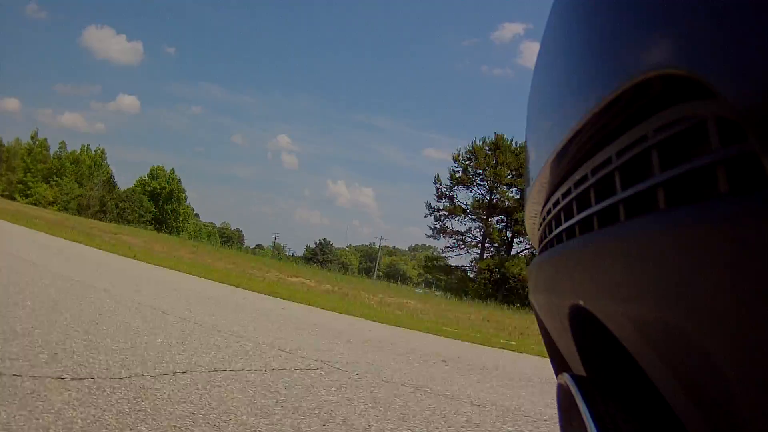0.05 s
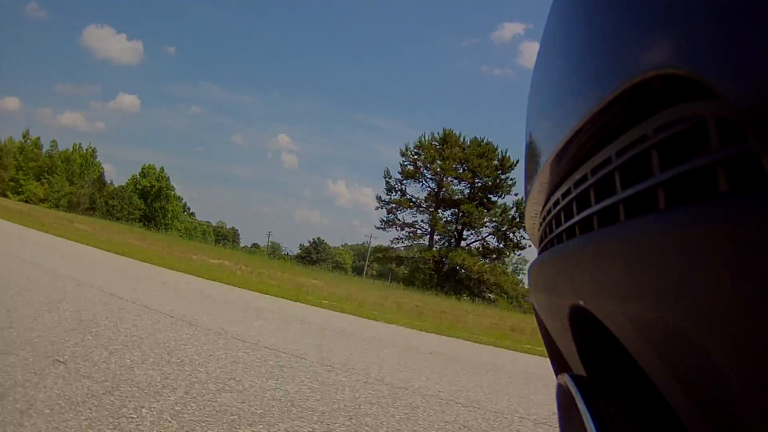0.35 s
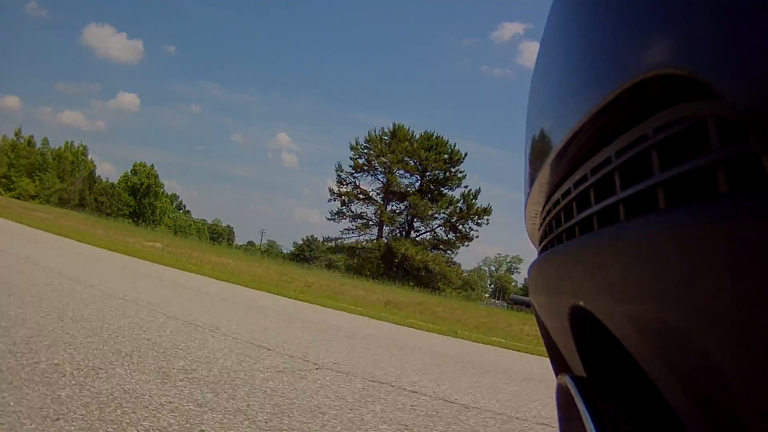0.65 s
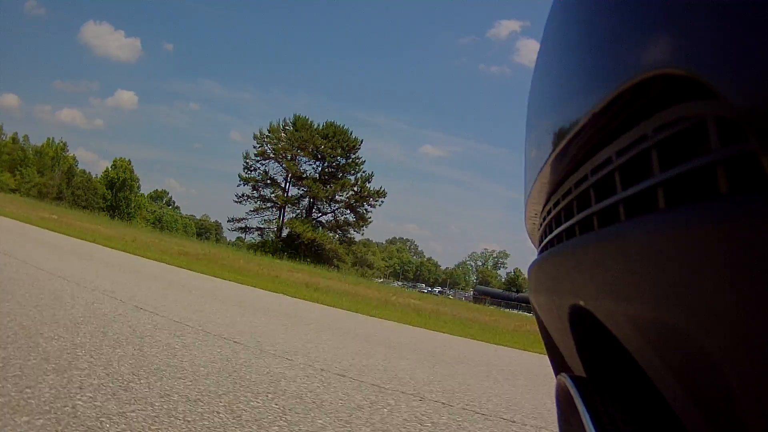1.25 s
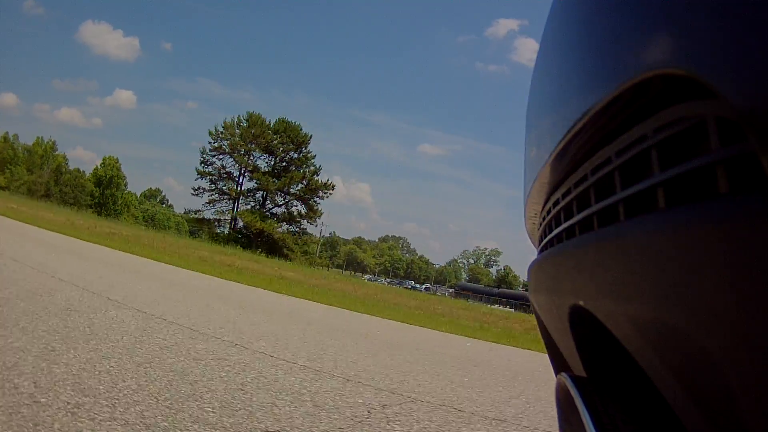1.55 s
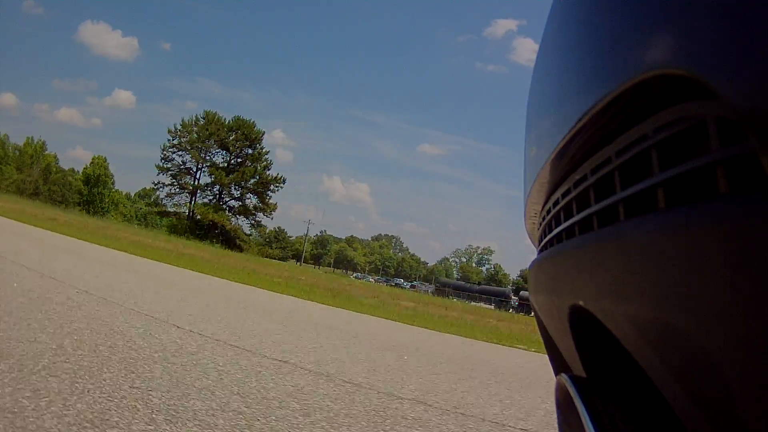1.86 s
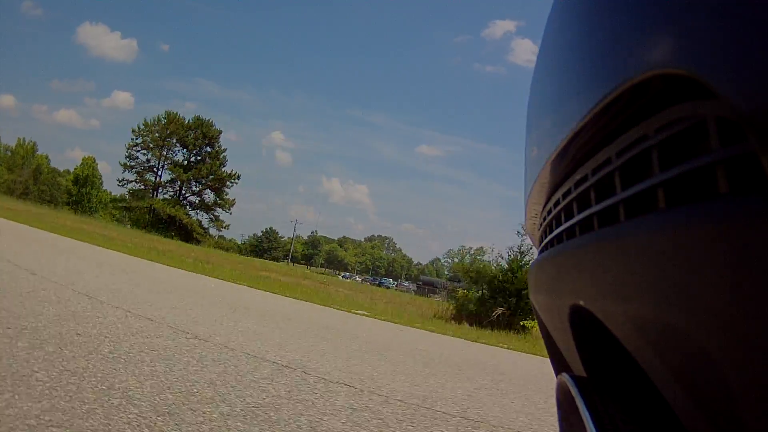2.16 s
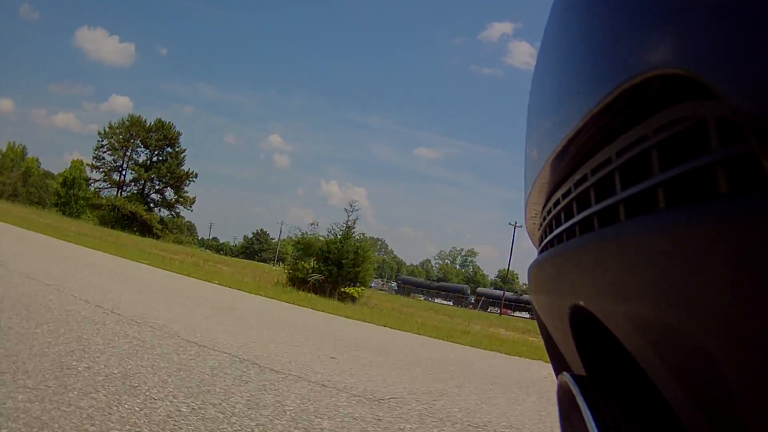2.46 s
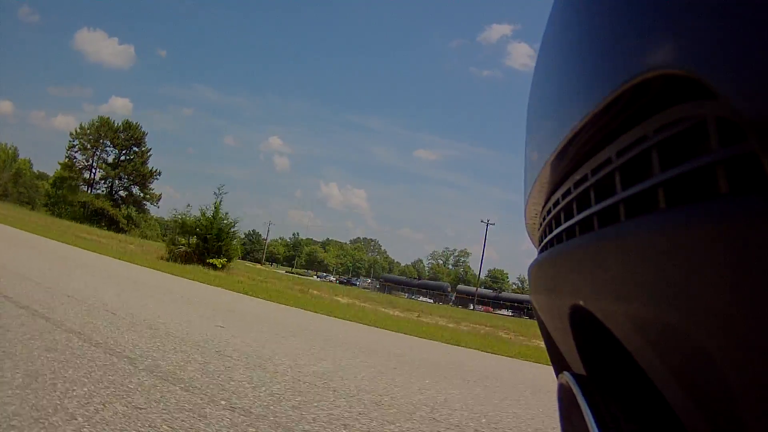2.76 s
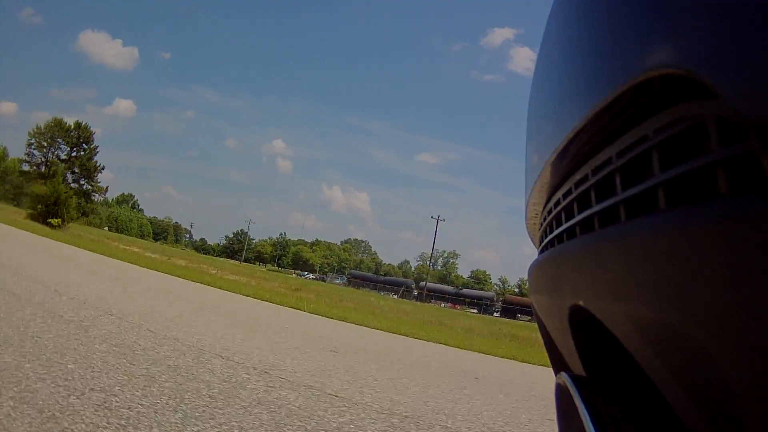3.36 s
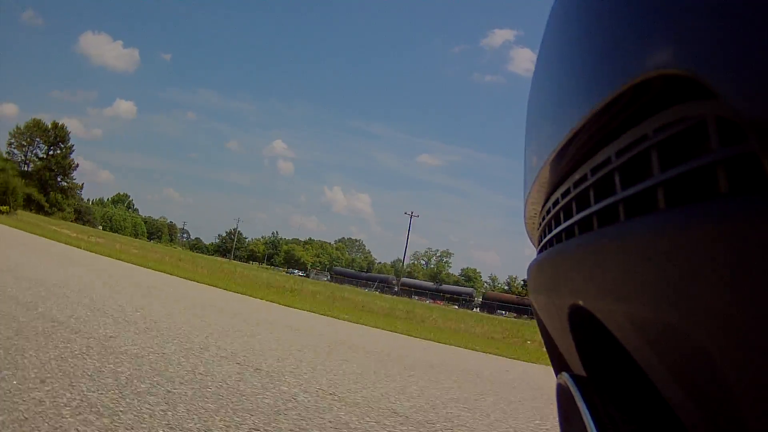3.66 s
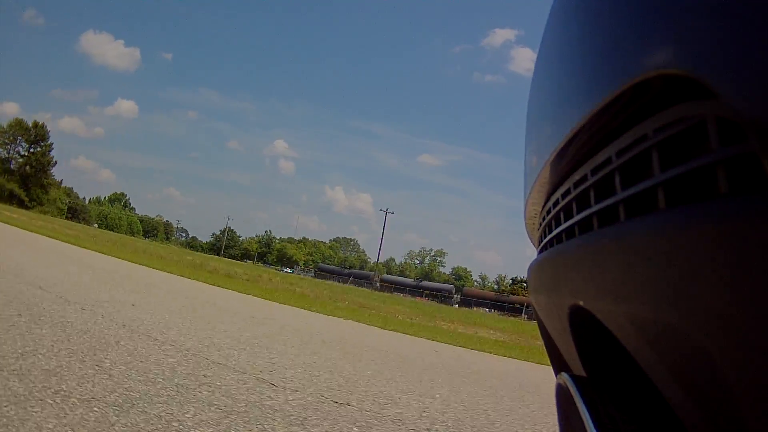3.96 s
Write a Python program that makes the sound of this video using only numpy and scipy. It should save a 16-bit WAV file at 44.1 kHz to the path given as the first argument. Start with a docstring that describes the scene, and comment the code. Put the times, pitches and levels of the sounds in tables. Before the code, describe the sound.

A V8 car booms and rasps up through the revs with one exhaust crack, burbles as the throttle lifts, then pulls in the next gear and pops. Wind buffets a microphone on the car's side over tyre roar.

```python
"""A V8 booms and rasps up through the revs, lifts off with a burble, then pulls again in the next gear.
Eight uneven firings a cycle ring two exhaust pipes and puff out of the tips; unburnt fuel goes off
once in each pull, first a crack, then a pop. Wind buffets a microphone on the car's flank;
the tyres roar and flick grit at the body."""
import sys
import numpy as np
from scipy import signal
from scipy.fft import rfft, irfft, next_fast_len
from scipy.io import wavfile
from scipy.ndimage import uniform_filter1d

SR = 44100
rng = np.random.default_rng(int(sys.argv[2]) if len(sys.argv) > 2 else 0)


def persist_wave(psi):
    """Save psi, clipped to +-1, as 16-bit WAV."""
    counts = np.round(np.clip(psi, -1, 1) * 32767).astype(np.int16)
    wavfile.write(sys.argv[1], SR, np.atleast_2d(counts).T)


N = 176400
TIME_S = np.arange(N) / SR

# exhaust tip response: f/Hz, gain/dB
TIP_SPECTRUM = [(440, -22), (750, -1.5), (900, -11.5), (1070, -0.5), (1240, -5), (1380, 0), (1620, -5.5),
                (1780, -2), (2080, -3.5), (2320, -12.5), (2560, -1), (2750, -17.5), (2930, -7.5),
                (3150, -9.5), (3350, -19.5), (3550, -16.5), (4020, -34.5), (4270, -19.5), (4420, -27),
                (4720, -18.5), (5400, -37), (6300, -43), (7200, -42.5), (9000, -55.5), (12000, -76.5)]
# turbulent gas in the pipes: f/Hz, gain/dB
GAS_SPECTRUM = [(60, -21.5), (110, -3), (190, -1.5), (245, 0.5), (285, -1.5), (340, 1.5), (410, -10.5),
                (510, 0.5), (570, -5.5), (650, -9), (740, -17.5), (830, -29.5), (2000, -73.5), (8000, -140)]


def amp(db):
    """dB to gain."""
    return 10 ** (np.asarray(db) / 20)


def unit(x):
    """Scale to rms 1."""
    return x / np.sqrt(np.mean(x ** 2) + 1e-20)


def steady(x):
    """Scale to running rms 1 over 0.2 s."""
    return x / np.sqrt(np.abs(uniform_filter1d(x ** 2, size=8820)) + 1e-20)


def curve(rows):
    """One value per sample from (t/s, value) rows."""
    return np.interp(TIME_S, *np.transpose(rows))


def colour(x, points):
    """Minimum-phase filter from (f/Hz, gain/dB) rows."""
    m = 2 * next_fast_len(N // 2 + SR // 4)
    hz, db = np.transpose(points)
    gain_db = np.interp(np.log(np.fft.rfftfreq(m, 1 / SR) + 1), np.log(hz + 1), db)
    cepstrum = irfft(np.log(amp(gain_db)), m)
    cepstrum[1:m // 2] *= 2
    cepstrum[m // 2 + 1:] = 0
    return irfft(rfft(x, m) * np.exp(rfft(cepstrum)), m)[:N]


def impulses(times_s, sizes):
    """Single-sample kicks."""
    samples = np.round(np.asarray(times_s) * SR).astype(int)
    return np.bincount(np.clip(samples, 0, N), sizes, N + 1)[:N]


def fade(x, decay_s):
    """Exponential tail on every kick."""
    return signal.lfilter([1], [1, -np.exp(-1 / (decay_s * SR))], x)


def noise():
    """White noise."""
    return rng.standard_normal(N)


def coasting(t):
    """0 on throttle, 1 with the pedal lifted."""
    lift_s, resume_s, pedal_s = 2.42, 3.12, 0.19
    return np.clip(np.minimum(t - lift_s, resume_s - t) / pedal_s + .5, 0, 1)


def firings(phase):
    """Uneven cylinder pulses for the two pipes and the tips; the pipe pulses go ragged when coasting."""
    # in firing order: strength/dB, delay/ms, share into second pipe/0-1, tip puff/dB
    cylinders = [(3.37, 0.03, 0.42, -1.0), (4.18, 0.09, 0.86, -1.0), (2.66, 0.01, 0.47, 1.5),
                 (-2.12, -0.44, 0.65, -1.0), (2.56, -0.27, 0.0, -4.0), (-1.21, -0.52, 0.4, 4.5),
                 (-3.33, 0.84, 1.0, 4.0), (2.78, -0.24, 0.4, -2.0)]
    jitter_ms, burble_ms, tip_delay_s = .03, .62, .0003
    scatter_db, burble_db, puff_scatter_db = .5, 1.8, 1.5
    count = np.arange(int(phase[0]) + 1, int(phase[-1]))
    fire_s = np.interp(count, phase, TIME_S)
    db, delay_ms, share, puff_db = np.array(cylinders)[count % len(cylinders)].T
    size, slip, spit = rng.standard_normal((len(count), 3)).T
    shut = coasting(fire_s)
    arrival_s = fire_s + (delay_ms + slip * (jitter_ms + burble_ms * shut)) / 1000
    sizes = amp(db + size * (scatter_db + burble_db * shut))
    pipe_pulses = np.array([impulses(arrival_s, sizes * side) for side in (1 - share, share)])
    tip_pulses = impulses(fire_s + tip_delay_s, amp(puff_db + puff_scatter_db * spit))
    return pipe_pulses, tip_pulses


def boom(phase):
    """Exhaust tone at the firing rate."""
    # envelope: t/s, relative level/dB
    levels = [(0.0, -35.5), (0.15, -33.5), (0.59, -22.5), (1.07, -18), (2.19, -20.5), (2.41, -29.5),
              (2.46, -36.5), (2.62, -26), (3.03, -29.5), (3.36, -20), (3.96, -21)]
    return unit(np.cos(2 * np.pi * phase)) * amp(curve(levels) - 1.5)


def pipe_ring(pipe_pulses):
    """Each pipe rings the resonances in its own way; the silencer dulls the sum."""
    # resonances: f/Hz, width/Hz, signed gain in first pipe, in second
    modes = [(162.09, 22.0, 1.29, 0.16), (266.97, 73.13, -0.31, 0.35), (333.12, 51.0, -1.69, 0.54),
             (346.91, 22.09, 0.44, -0.38), (355.54, 109.76, 1.05, -0.34), (447.14, 39.87, 0.34, 0.01),
             (479.84, 63.64, -0.46, 0.6), (524.79, 96.16, -0.65, 0.14), (521.69, 47.13, 1.2, -1.17),
             (618.92, 43.95, 0.31, -0.08), (668.7, 28.57, -0.1, 0.22)]
    # silencer response: f/Hz, gain/dB
    silencer = [(60, -15), (170, -5.5), (230, -3), (300, 1), (520, -.5), (640, 2.5), (700, 1.5), (760, -4),
                (840, -25.5), (1100, -33), (2000, -61.5), (8000, -120)]
    m = next_fast_len(N + SR // 2)
    f = np.fft.rfftfreq(m, 1 / SR)
    response = sum(np.outer(gains, 1j * f * width_hz / (hz * hz - f * f + 1j * f * width_hz))
                   for hz, width_hz, *gains in modes)
    ringing = irfft((rfft(pipe_pulses, m) * response).sum(axis=0), m)[:N]
    return colour(ringing, silencer)


def pipes(pipe_pulses, flow, shut):
    """Pipe ring leads on throttle, turbulent gurgle when coasting."""
    # envelope: t/s, relative level/dB
    levels = [(0.0, -36), (0.05, -32), (0.11, -36), (0.5, -27.5), (1.65, -24.5), (2.09, -21), (2.44, -26),
              (2.62, -24), (2.88, -28.5), (2.91, -21), (2.95, -31.5), (3.1, -27.5), (3.58, -24.5),
              (4.0, -26)]
    gurgle_pull_db, ring_coast_db = -5.5, -7
    gurgle = steady(colour(flow * noise(), GAS_SPECTRUM)) * amp((1 - shut) * gurgle_pull_db)
    ring = steady(pipe_ring(pipe_pulses)) * amp(shut * ring_coast_db)
    return (ring + gurgle) * amp(curve(levels) + 1)


def tip_rasp(phase, tip_pulses, flow, shut):
    """Gas puffs from the tips: rasp, crackle and whine on throttle, spitting when coasting."""
    # envelope: t/s, relative level/dB
    levels = [(0.0, -57), (0.16, -56.5), (0.88, -39), (1.94, -34), (2.17, -34.5), (2.39, -46),
              (2.68, -42.5), (3.14, -45), (3.45, -39), (3.96, -38.5)]
    # whining orders: multiple of firing rate, level before tip response/dB
    orders = [(7, -13), (7.875, -13.5)]
    # tips with throttle shut: f/Hz, gain/dB
    coast_spectrum = [(440, -29.5), (800, 3), (1150, 2), (1550, 1.5), (1780, 4.5), (2080, 3), (2240, -9),
                      (2450, 0.5), (3100, -12), (3550, -10), (3900, -18.5), (4750, -12.5), (5400, -25),
                      (6600, -34), (8000, -43.5), (12000, -52.5)]
    puffs = flow * noise()
    rasp = amp(-.8) * steady(colour(puffs, TIP_SPECTRUM))
    crackle = amp(-15) * steady(colour(tip_pulses, TIP_SPECTRUM))
    whine = sum(amp(db) * unit(np.sin(2 * np.pi * order * phase)) for order, db in orders)
    pulling = rasp + crackle + colour(whine, TIP_SPECTRUM)
    spitting = steady(colour(puffs, coast_spectrum))
    return amp(curve(levels)) * ((1 - shut) * pulling + shut * spitting)


def exhaust():
    """One train of firings drives boom, pipes and tips."""
    # firing rate: t/s, f/Hz
    firing_rate = [(0, 117.4), (.15, 118.05), (.26, 113.6), (.42, 121.3), (.57, 120.7), (.72, 125.1),
                   (1, 131.1), (1.5, 144), (2, 157.5), (2.27, 162.6), (2.46, 164.15), (2.66, 152.5),
                   (2.88, 142.9), (3.08, 113.15), (3.18, 117.2), (3.52, 120.25), (3.85, 124.8), (4, 125.3)]
    phase = 3.6 + np.cumsum(curve(firing_rate)) / SR  # in firings
    pipe_pulses, tip_pulses = firings(phase)
    shut = coasting(TIME_S)
    flow = unit(fade(tip_pulses, decay_s=.0028)) + .7  # puffs on a steady stream
    return boom(phase) + pipes(pipe_pulses, flow, shut) + tip_rasp(phase, tip_pulses, flow, shut)


def wind():
    """Low buffeting and a few hard slaps on the microphone."""
    # buffeting: f/Hz, gain/dB
    spectrum = [(6, -27.5), (18, 17), (35, 14), (55, 11.5), (90, 9), (180, -2.5), (500, -70.5)]
    # gusts: t/s, level/dB
    gusts = [(0.0, -19), (0.05, -32.5), (1.48, -27), (1.6, -28), (1.74, -19.5), (1.77, -27.5),
             (2.56, -29.5), (2.83, -19.5), (3.34, -33), (3.43, -23), (3.51, -24), (3.91, -29.5),
             (3.95, -22), (4.0, -19)]
    # pressure slaps: t/s, level/dB, polarity
    slaps = [(.485, -19, -1), (1.129, -17, 1), (1.73, -18, 1), (2.85, -16, -1), (3.431, -11, 1),
             (3.955, -18, -1)]
    slap_s = .016
    pressure = steady(colour(noise(), spectrum)) * amp(curve(gusts))
    for at_s, db, polarity in slaps:
        u = (TIME_S - at_s) / slap_s
        pressure += polarity * amp(db) * (1 - 2 * u ** 2) * np.exp(-u ** 2)
    return pressure


def tyres():
    """Steady road roar and grit ticking on the body; while coasting the exhaust crackles with a fine high
    sizzle."""
    # road roar: f/Hz, gain/dB
    road_spectrum = [(40, -13.5), (120, -0.5), (300, 4.5), (520, -0.5), (700, -12.5), (850, -13.5),
                     (2000, -22), (3300, -30.5), (5000, -41.5), (6000, -48), (8000, -59.5), (13000, -75.5)]
    # sizzle: f/Hz, gain/dB
    sizzle_spectrum = [(1500, -25), (4000, -5), (6600, 0), (8200, -7), (9200, -22), (11000, -48)]
    # grit strikes: t/s, level before filter/dB
    strikes = [(1.645, -41), (2.695, -42), (2.93, -49), (3.424, -48), (3.472, -50)]
    # tick on the body: f/Hz, gain/dB
    tick_spectrum = [(1500, -25), (4000, -4), (6600, -4.5), (8200, -8.5), (10000, -11), (13000, -19)]
    road_db, grains_per_s = -36, 260
    position, size = rng.random((int(grains_per_s * N / SR), 2)).T
    grain_s = position * N / SR
    grains = impulses(grain_s, coasting(grain_s) * amp(-69 + 10 * size))
    sizzle = fade(grains, decay_s=.003) * noise()
    strike_s, strike_db = np.transpose(strikes)
    grit = fade(impulses(strike_s, amp(strike_db)), decay_s=.0018) * noise()
    roar = amp(road_db) * unit(colour(noise(), road_spectrum))
    return roar + colour(sizzle, sizzle_spectrum) + colour(grit, tick_spectrum)


def afterfire():
    """Unburnt fuel goes off twice: a crack at the tips, a thudding pop in the pipes."""
    crack_s, crack_peak_db = 1.577, -22.5
    pop_s, pop_peak_db = 3.9, -15
    burst = fade(impulses([crack_s], [1]), decay_s=.0053) * noise()
    crack = colour(burst, TIP_SPECTRUM)
    pop = colour(impulses([pop_s], [1]), GAS_SPECTRUM)
    return amp(crack_peak_db) * crack / np.abs(crack).max() + amp(pop_peak_db) * pop / np.abs(pop).max()


def scene():
    """Mono sum at the bodywork."""
    return (exhaust() + afterfire() + wind() + tyres())[None]


def record(dry):
    """Brick-wall low-pass."""
    cutoff_hz = 13500
    m = next_fast_len(N + SR // 2)
    passband = np.fft.rfftfreq(m, 1 / SR) < cutoff_hz
    return irfft(rfft(dry, m) * passband, m)[..., :N]


dry = scene()
out = record(dry)
persist_wave(out)
```